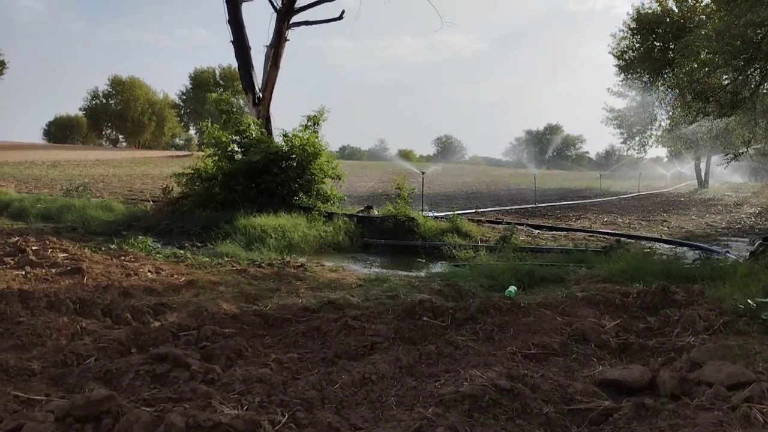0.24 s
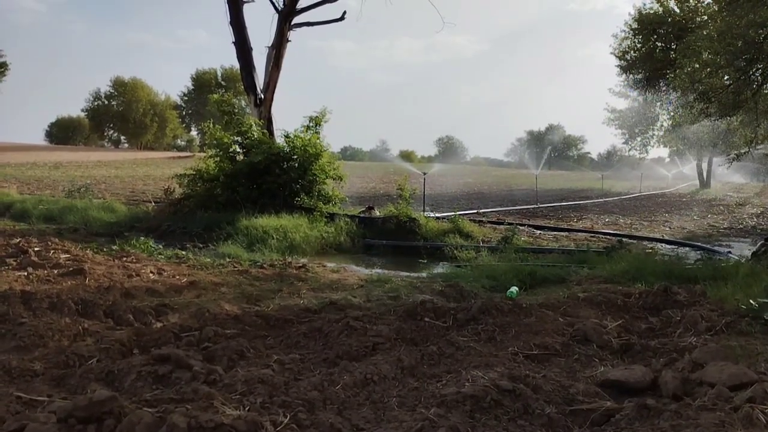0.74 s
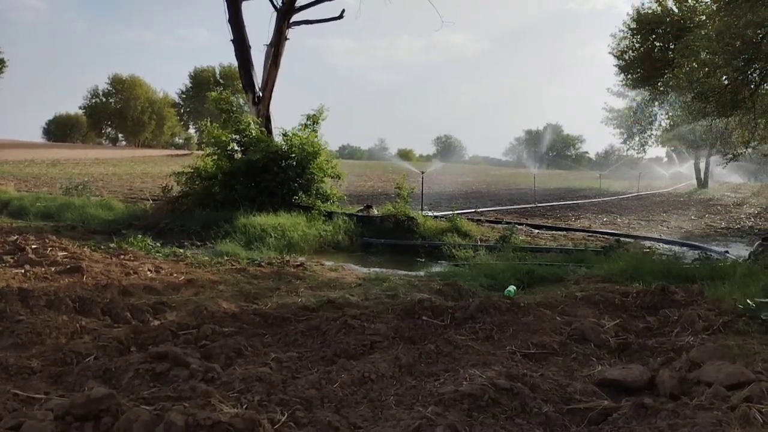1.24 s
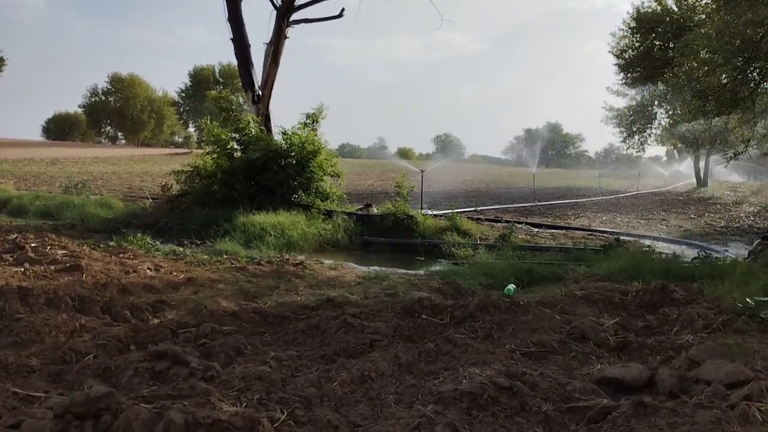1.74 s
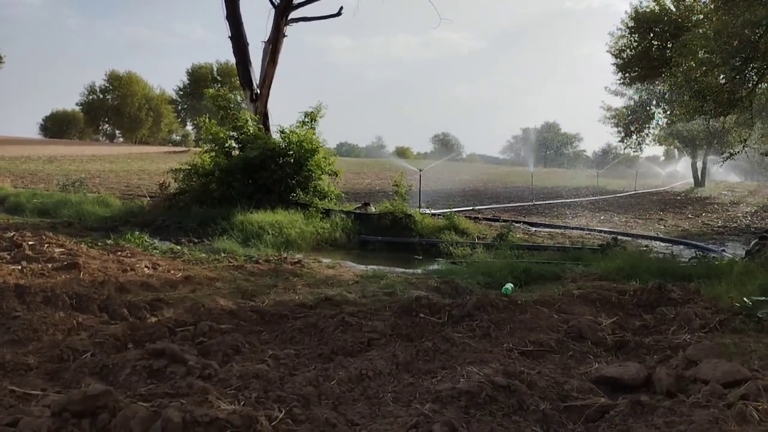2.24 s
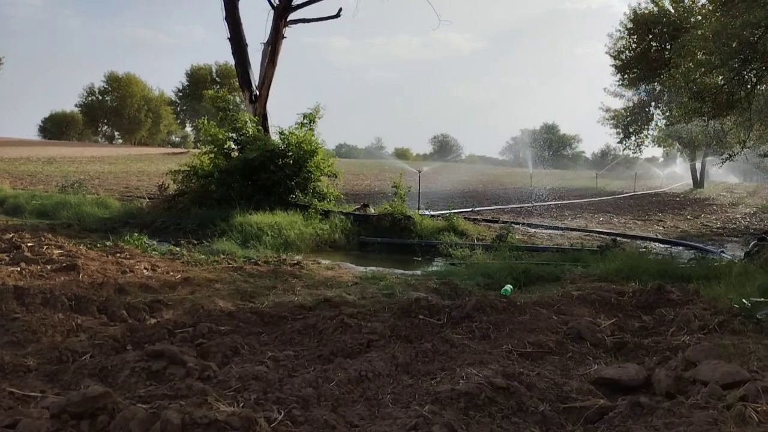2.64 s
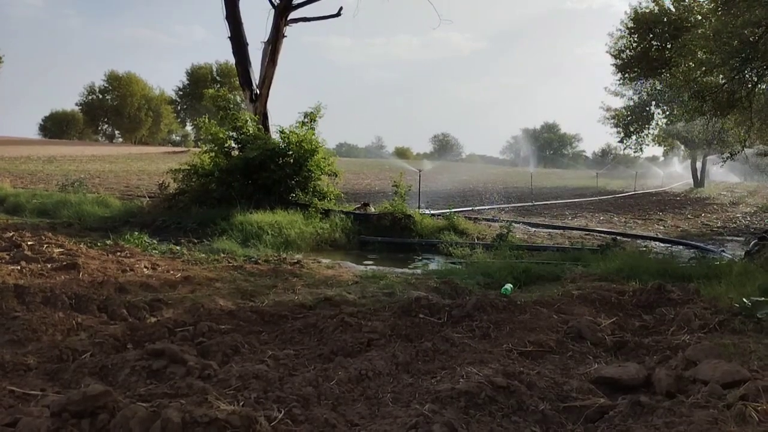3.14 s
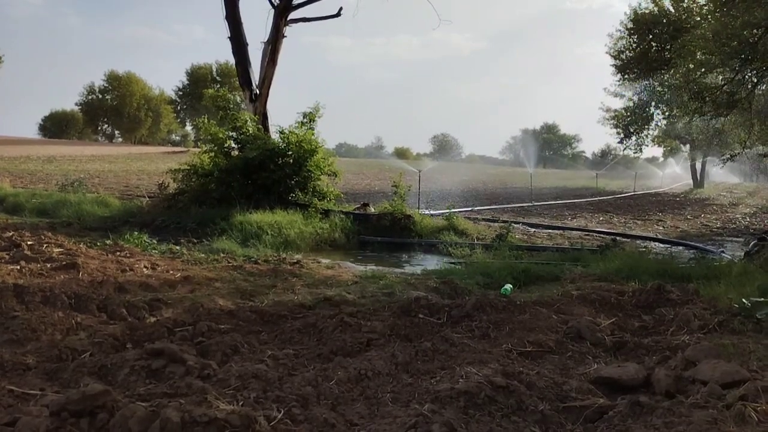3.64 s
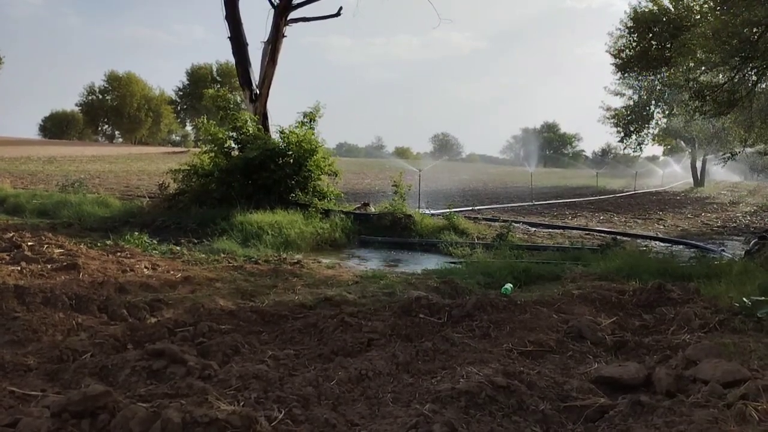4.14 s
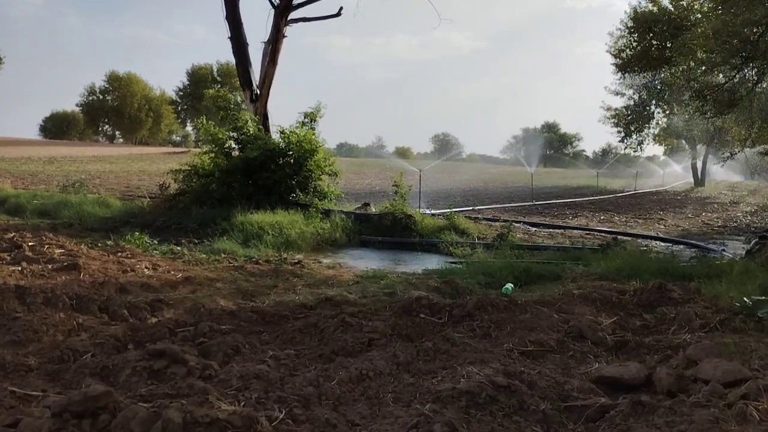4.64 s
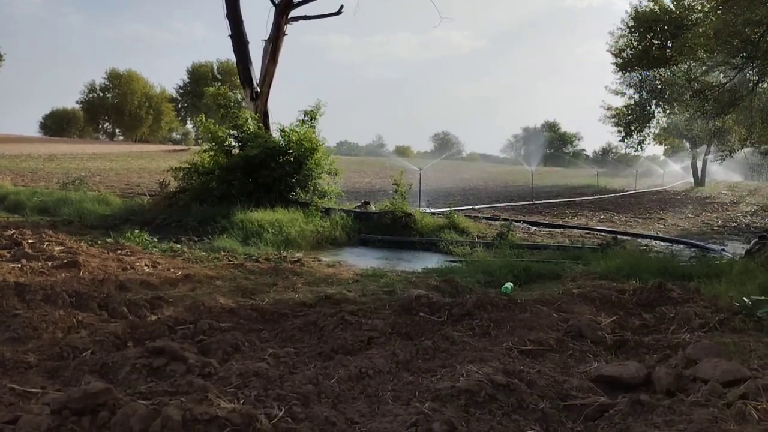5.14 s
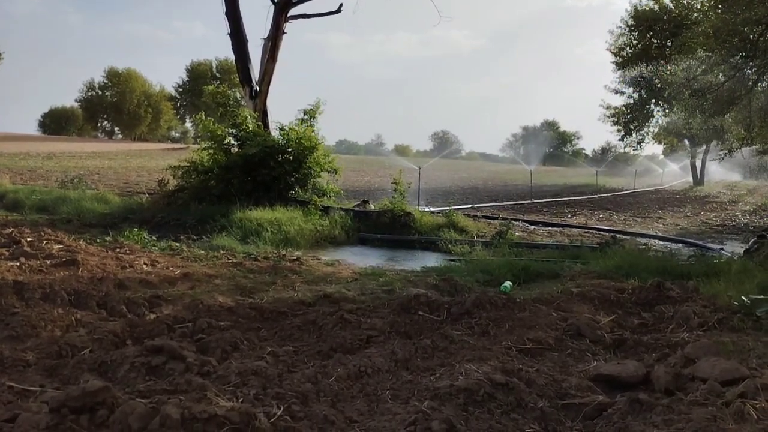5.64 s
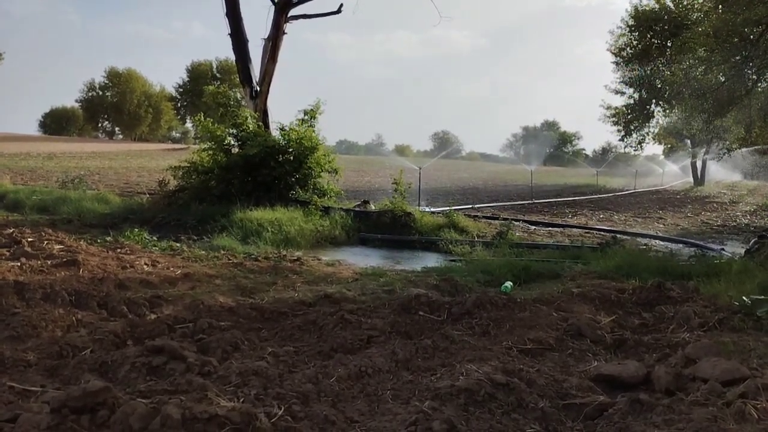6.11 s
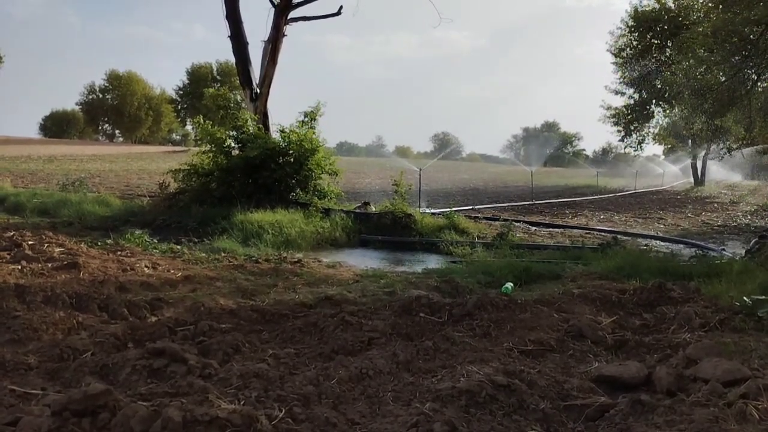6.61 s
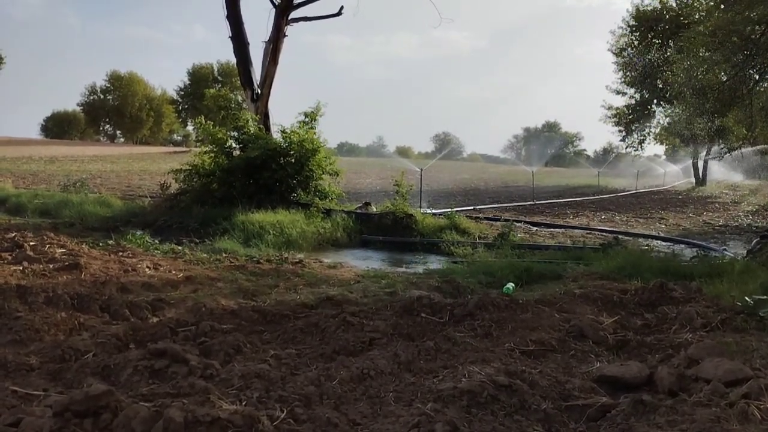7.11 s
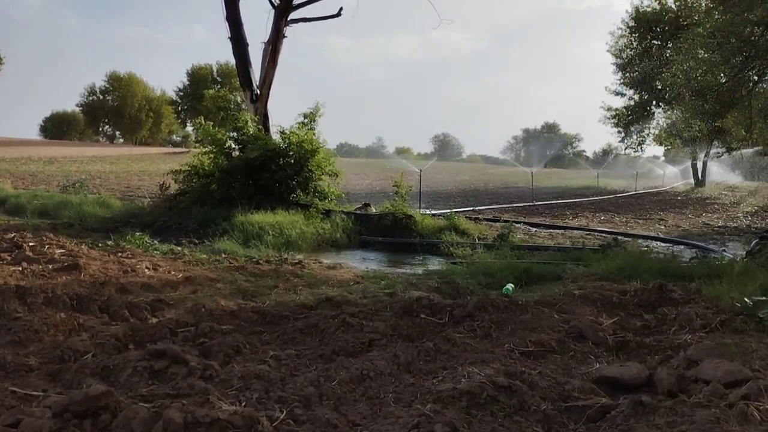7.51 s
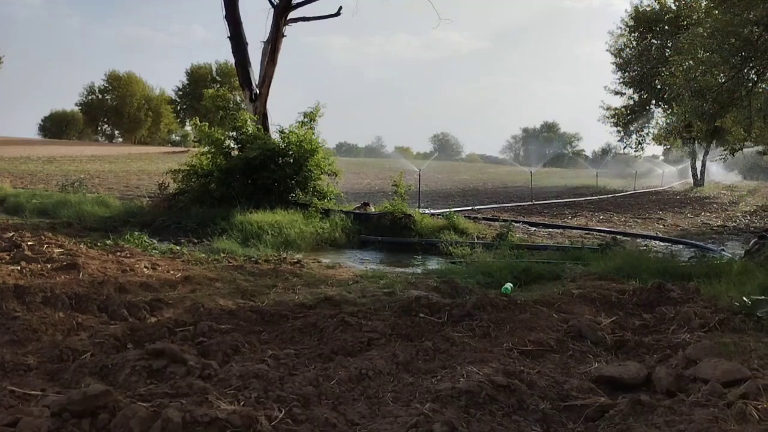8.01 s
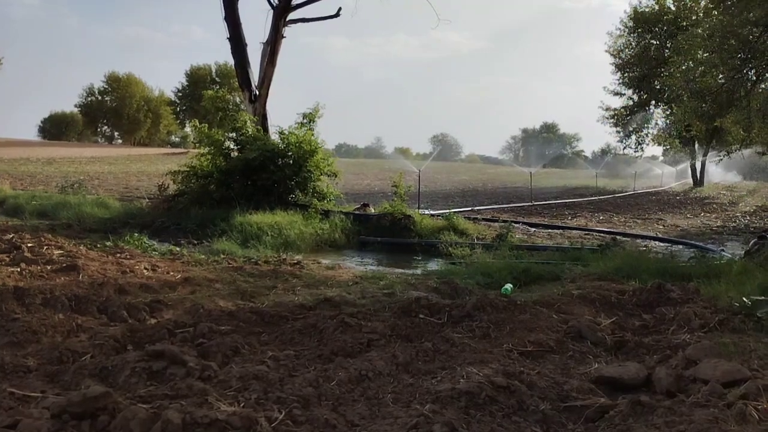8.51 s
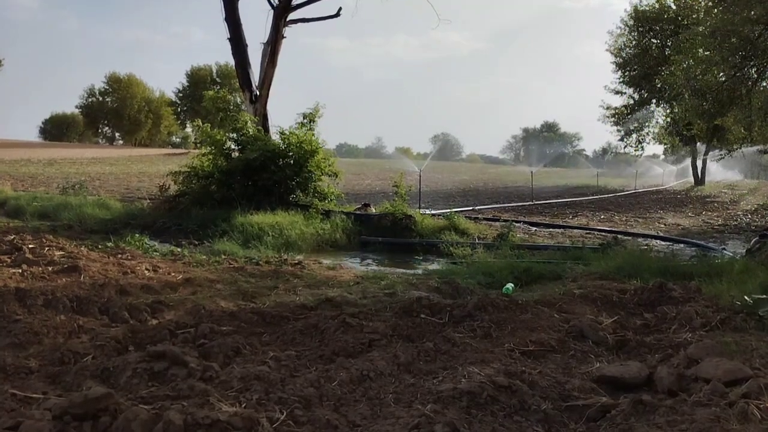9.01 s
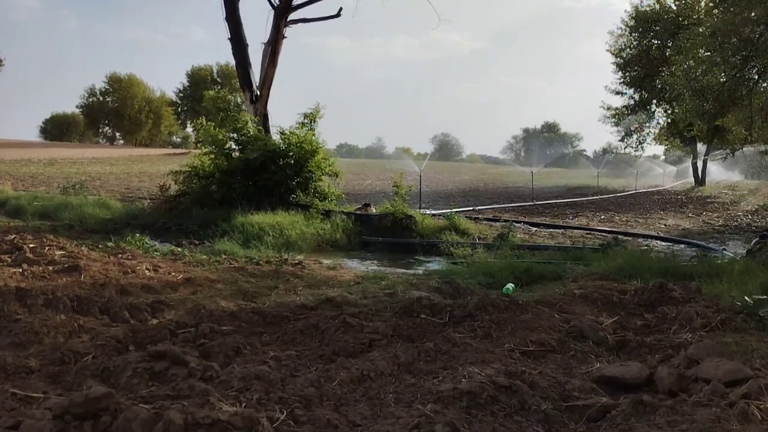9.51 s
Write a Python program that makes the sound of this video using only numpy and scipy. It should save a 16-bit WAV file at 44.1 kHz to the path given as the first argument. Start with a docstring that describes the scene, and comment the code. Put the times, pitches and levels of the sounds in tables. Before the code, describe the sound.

At the edge of an open field, far sprinklers make a steady bright hiss with fine pattering drops. A nearer one spits about four times a second, each spurt led by a small crack. Midway, sharp slaps land and water drums on something hollow. Faint bird whistles come at the start and near the end; dry taps click, then a gust thumps the microphone and rustles leaves.

```python
"""Impact sprinklers over a ploughed field

Heard from the edge of the field, the nearest sprinkler spits about four times a second over the hiss
of the others: filtered noise and ringing drops, swelling with each cut of the jet. Its water drums on
something hollow, a bank of resonators, most strongly about 4 s. Gliding sines make a far bird's whistles,
damped modes make a few dry taps and plinks, and a wavering sine makes a faint far tone. Near the end a gust
thumps the microphone with push-pull pulses and rustles leaves.
"""
import sys
import numpy as np
from scipy import signal
from scipy.fft import rfft, irfft, next_fast_len
from scipy.io import wavfile
from scipy.ndimage import uniform_filter1d

SR = 44100
rng = np.random.default_rng(int(sys.argv[2]) if len(sys.argv) > 2 else 0)


def output_pcm(signal):
    """Save a mono or channel-first signal as 16-bit PCM at the path in sys.argv[1].

    Samples are clipped to [-1, 1] before scaling.
    """
    pcm = np.clip(np.atleast_2d(signal).T, -1, 1) * 32767
    wavfile.write(sys.argv[1], SR, np.round(pcm).astype(np.int16))


N = 430414  # samples


def from_db(db):
    """Logarithmic level: 20 dB is a tenfold amplitude."""
    return 10 ** (np.asarray(db) / 20)


def rms_one(x):
    """Normalisation to unit mean power."""
    return x / np.sqrt(np.mean(x ** 2) + 1e-20)


def in_time(rows):
    """Linear interpolation of a control table at every sample."""
    return np.interp(np.arange(N) / SR, *np.transpose(rows))


def at_hz(points, hz):
    """Interpolation along a logarithmic frequency axis."""
    known, values = np.transpose(points)
    return np.interp(np.log(hz + 1), np.log(known), values)


def drift(rate_hz):
    """Low-passed noise: a random fluctuation of unit rms, slower than about rate_hz."""
    step, settle = 40, 2000  # samples per slow step, slow steps discarded
    r = np.exp(-2 * np.pi * rate_hz * step / SR)
    white = rng.standard_normal(N // step + settle + 2)
    slow = signal.lfilter([1], [1, -2 * r, r * r], white)[settle:]
    return np.interp(np.arange(N) / step, np.arange(len(slow)), rms_one(slow))


def resonate(x, hz, r):
    """Two-pole resonance: pole radius r sets the decay per sample."""
    return signal.lfilter([1, 0, -1], [1, -2 * r * np.cos(2 * np.pi * hz / SR), r * r], x)


# Likeness of the left and right channels: columns f/Hz, likeness (0 to 1)
CHANNEL_LIKENESS = [(2800, 1), (4400, 1), (6000, 0.94), (8000, 0.51), (14000, 0.64)]


def coloured(pair, colour, width=1):
    """Spectral shaping and mid-side stereo: two signals share a colour, wide only in the treble; mid rms 1."""
    size = next_fast_len(N, real=True)
    hz = np.arange(size // 2 + 1) * SR / size
    low_cut = hz / np.hypot(hz, 20)
    mid, side = rfft(pair, size) * from_db(at_hz(colour, hz)) * low_cut
    alike = np.clip(at_hz(CHANNEL_LIKENESS, hz), 0, 1)
    side_gain = width * np.sqrt((1 - alike) / (1 + alike))
    mid, side = irfft([mid, side * side_gain], size)[:, :N]
    return (mid + side * [[1], [-1]]) / np.std(mid)


def drops(per_s, spread_db, cycles, count=12):
    """Impulse excitation of resonators: chance drops ring at one of count pitches, -60 dB after cycles."""
    at = np.flatnonzero(rng.random(N) < per_s / SR)
    sizes_db = spread_db * np.minimum(rng.exponential(1, len(at)), 5)
    sizes = from_db(sizes_db) * rng.choice([-1, 1], len(at))
    place = rng.normal(0, 1, len(at))  # ratio of second channel to first
    dealt = rng.integers(0, count, len(at))
    out = np.zeros((2, N))
    for k, hz in enumerate(np.geomspace(4200, 13000, count)):
        mine = dealt == k
        clicks = np.full((2, N), 1e-18)
        clicks[:, at[mine]] = sizes[mine], sizes[mine] * place[mine]
        out += resonate(clicks, hz, from_db(-60 * hz / (cycles * SR)))
    return rms_one(out)


def clumps(per_s, t60):
    """Shot noise: chance hits begin at once and decay by 60 dB in t60 seconds; mean power 1."""
    hits = (rng.random(N) < per_s / SR) * rng.exponential(1, N) ** 2
    power = signal.lfilter([1], [1, -from_db(-120 / (t60 * SR))], hits + 1e-18)
    return power / power.mean()


def noise_bands(edges_hz):
    """Band-pass filtering: yield stereo noise split between neighbouring edges."""
    white = rng.standard_normal((2, 2, N))
    for k in range(len(edges_hz) - 1):
        sos = signal.butter(2, edges_hz[k:k + 2], "band", fs=SR, output="sos")
        yield signal.sosfilt(sos, white[k % 2])


def torn_water(patchy_db, lumpy, count=9):
    """Amplitude modulation of a breaking jet: lumpy in time, each band flickering on its own."""
    out = 0
    for band in noise_bands(np.linspace(200, 15000, count + 1)):
        out = out + band * from_db(patchy_db * drift(21.7))
    share = np.clip(lumpy, 0, 1)
    return out * np.sqrt(1 - share + share * clumps(per_s=600, t60=0.021))


def steadied(x, size=2200):
    """Short-term normalisation: keep the fine grain but hold the power even over about 50 ms."""
    return x / np.sqrt(uniform_filter1d(np.mean(x ** 2, axis=0), size) + 1e-12)


def swells(rows, shape):
    """Energy addition: bursts rise and die away, and their powers add."""
    power = np.zeros(N)
    for s, level_db, rise, fall in rows:
        near = np.arange(max(0, int((s - .2) * SR)), min(N, int((s + .3) * SR)))
        t = near / SR - s
        decay = np.where(t < 0, (t / rise) ** 2, np.abs(t / fall) ** shape)
        power[near] += (from_db(level_db) * np.exp(-decay)) ** 2
    return np.sqrt(power)


# Steady spray of the whole field: columns t/s, level/dB
SPRAY_LEVEL = [(0.0, -55.5), (1.63, -52), (8.56, -54.5), (9.76, -53)]
# Spectrum of that spray: columns f/Hz, level/dB per Hz
SPRAY_SPECTRUM = [(1000, -17.5), (2100, -14), (3000, -9.5), (4400, -4.5), (5700, -10.5), (6600, -2.5),
                  (7400, 1), (8600, 0.5), (10000, -2), (11500, -5.5), (12600, -9), (14500, -20.5)]


def field():
    """Superposition: far sprinklers blur into a hiss, from which nearer drops patter and tinkle."""
    hiss = from_db(-2.0) * coloured(torn_water(patchy_db=2.5, lumpy=0.05), SPRAY_SPECTRUM, width=1.19)
    patter = from_db(-9) * coloured(drops(per_s=2200, spread_db=3.8, cycles=12), SPRAY_SPECTRUM)
    tinkle_drops = drops(per_s=500, spread_db=3.0, cycles=160, count=37)
    tinkle = from_db(-10) * coloured(tinkle_drops, SPRAY_SPECTRUM)
    return from_db(in_time(SPRAY_LEVEL) + 1.18 * drift(7.5)) * (hiss + patter + tinkle)


def sizzle(patchy_db, count=16):
    """Narrow-band fluctuation: whistling bands come and go in the spray; rms 1."""
    out = 0
    weights = np.sqrt(np.hanning(count + 2)[1:-1])
    for weight, band in zip(weights, noise_bands(np.linspace(7000, 10000, count + 1))):
        out = out + weight * band * from_db(patchy_db * np.minimum(drift(13), 2))
    return rms_one(out[0] + .5 * out[1] * [[1], [-1]])


def whistling_spray(force):
    """Power addition: the sizzle follows the near and the steady water together."""
    all_water = np.hypot(force, from_db(in_time(SPRAY_LEVEL)))
    return from_db(-6.5) * all_water * steadied(sizzle(patchy_db=8))


# Murmur of open country: columns f/Hz, level/dB per Hz
AIR_SPECTRUM = [(100, 2.5), (220, 0.5), (300, -9.5), (440, -5.5), (580, -10.5), (1050, -13), (1300, -10.5),
                (1520, -18.5), (1720, -11), (2000, -25), (4000, -27)]
# Wind on the microphone: columns t/s, level/dB
WIND_LEVEL = [(0, -57.5), (5.4, -56.5), (7, -54.5), (8.55, -56), (8.8, -45.5), (9.76, -45.5)]
# Spectrum of that wind: columns f/Hz, level/dB per Hz
WIND_SPECTRUM = [(36, -1), (55, -0.5), (80, -6.5), (130, -14), (400, -42.5), (1000, -46)]


def air():
    """Broadband noise: a dull open-country murmur, and wind rumbling on the microphone."""
    far = coloured(rng.standard_normal((2, N)), AIR_SPECTRUM)
    far_gain = from_db(-64.5 + 0.67 * drift(4.2))
    wind = coloured(rng.standard_normal((2, N)), WIND_SPECTRUM)
    wind_gain = from_db(in_time(WIND_LEVEL) + 1.2 * drift(8.3))
    return far_gain * far + wind_gain * wind


# Faint far tone: columns t/s, level/dB
FAR_TONE_LEVEL = [(0, -82), (1.0, -76.5), (2.0, -82), (2.8, -75), (4.3, -80), (7.4, -80), (9.76, -87)]


def far_tone(hz=570):
    """Frequency modulation: a thin tone wavers in pitch and level at the edge of hearing."""
    pitch = hz * (1 + .04 * drift(4) + .02 * drift(30))
    gain = from_db(in_time(FAR_TONE_LEVEL) + 3.8 * drift(4.6))
    return gain * np.sin(2 * np.pi * np.cumsum(pitch) / SR)


# Bird whistles: columns t/s, length/s, start f/Hz, middle f/Hz, end f/Hz, level/dB
BIRD_WHISTLES = [(0.143, 0.11, 1700, 1885, 1950, -74.5), (0.268, 0.05, 2050, 1950, 1720, -75),
                 (7.815, 0.083, 2480, 2220, 2000, -70), (8.287, 0.054, 2620, 2530, 1980, -70.5),
                 (8.72, 0.05, 2780, 2650, 2380, -76)]


def bird():
    """Phase integration: thin whistles glide along parabolas, wavering in pitch and strength."""
    out = np.zeros(N)
    waver = 1 + .016 * drift(70)
    for s, length, start_hz, middle_hz, end_hz, level_db in BIRD_WHISTLES:
        u, at = np.linspace(0, 1, int(length * SR)), round(s * SR)
        glide = np.polyfit([0, .5, 1], [start_hz, middle_hz, end_hz], 2)
        hz = np.polyval(glide, u) * waver[at:at + len(u)]
        envelope = np.sqrt(2 * np.abs(np.sin(np.pi * u)))
        out[at:at + len(u)] += from_db(level_db) * envelope * np.sin(2 * np.pi * np.cumsum(hz) / SR)
    return out * (.9 + .35 * drift(50))


# The swinging arm cuts the jet about every quarter second: columns t/s, level/dB
JET_CUTS = [(0.154, -44), (0.39, -42.5), (0.638, -44), (0.876, -41.5), (1.115, -44), (1.373, -42),
            (1.603, -43.5), (1.85, -45.5), (2.074, -47), (2.313, -45), (2.557, -40.5), (2.813, -46),
            (3.039, -40.5), (3.274, -38), (3.518, -42), (3.762, -44.5), (4, -41.5), (4.24, -44.5),
            (4.49, -43), (4.726, -45), (4.965, -43.5), (5.202, -44), (5.445, -43), (5.688, -44.5),
            (5.927, -43.5), (6.168, -46), (6.412, -42.5), (6.65, -39.5), (6.892, -41.5), (7.135, -41),
            (7.373, -43), (7.61, -46), (7.855, -46), (8.11, -47.5), (8.343, -49), (8.585, -44.5),
            (8.803, -43.5), (9.061, -44.5), (9.283, -41), (9.547, -39.5)]
SPURT_RISE_S, SPURT_FALL_S = 0.014, 0.034
# The crack as the arm meets the jet comes before the spurt's peak; its level is relative to the spurt
CRACK_LEAD_S, CRACK_DB, CRACK_UNEVEN_DB = 0.0078, -6, 4
CRACK_RISE_S, CRACK_FALL_S = 0.00075, 0.0027


def spurts():
    """Periodic interruption: each arm swing gives a crack and a swell; rows t/s, level/dB, rise/s, fall/s."""
    rows = []
    for (s, level_db), sharp in zip(JET_CUTS, rng.uniform(-1, 1, len(JET_CUTS))):
        crack_db = level_db + CRACK_DB + CRACK_UNEVEN_DB * sharp
        rows.append((s - CRACK_LEAD_S, crack_db, CRACK_RISE_S, CRACK_FALL_S))
        rows.append((s, level_db, SPURT_RISE_S, SPURT_FALL_S))
    return rows


# Sharp cracks and slaps, the arm striking the jet or slugs of water landing:
# columns t/s at the peak, level/dB, fall/s
CRACKS_AND_SLAPS = [(1.541, -44.5, 0.0046), (2.551, -39, .006), (2.963, -38, 0.0065), (3.266, -36, 0.0085),
                    (3.411, -32.5, 0.0018), (3.644, -28, 0.0072), (3.752, -45, 0.0082), (3.877, -41, 0.046),
                    (4.239, -42, .006), (5.195, -35, 0.0026), (6.169, -36, .005), (6.408, -36.5, .008),
                    (9.061, -38, .003), (9.489, -35.5, 0.0094), (9.718, -31, .003)]
SHARP_RISE_S = 0.0011
# Thrown water swishes down between the spurts: columns t/s, level/dB
SOFT_SWISHES = [(.58, -50.5), (.974, -48), (2.888, -50.5), (4.653, -49), (5.045, -49.5), (6.025, -48),
                (6.225, -48.5), (8.007, -50), (8.417, -48), (8.998, -48), (9.204, -43.5), (9.4, -46.5),
                (9.622, -44.5)]
SWISH_RISE_S, SWISH_FALL_S = 0.021, 0.026
# Lesser slugs of water land at random
SPATTER_PER_S, SPATTER_DB, SPATTER_UNEVEN_DB = 8.9, -55, 4.5
SPATTER_RISE_S, SPATTER_FALL_S = 0.0023, 0.01


def strikes_and_landings():
    """Transient excitation: cracks, slaps, swishes and chance spatter; rows t/s, level/dB, rise/s, fall/s."""
    rows = [(s, level_db, SHARP_RISE_S, fall) for s, level_db, fall in CRACKS_AND_SLAPS]
    rows += [(s, level_db, SWISH_RISE_S, SWISH_FALL_S) for s, level_db in SOFT_SWISHES]
    for i in np.flatnonzero(rng.random(N) < SPATTER_PER_S / SR):
        level_db = SPATTER_DB + SPATTER_UNEVEN_DB * rng.standard_normal()
        rows.append((i / SR, level_db, SPATTER_RISE_S, SPATTER_FALL_S))
    return rows


# Spectrum of the near water: columns f/Hz, level/dB per Hz
SPURT_SPECTRUM = [(400, -33), (1300, -26), (2100, -32.5), (4200, -13), (5700, -17.5), (7000, -6.5),
                  (7700, -8.5), (8600, 0), (9300, -3), (11300, -9), (14500, -31.5)]


def sprinkler(force):
    """Envelope shaping: the water's force swells a bright mixture of torn hiss and coarse drops."""
    hiss = coloured(torn_water(patchy_db=3.6, lumpy=0.46), SPURT_SPECTRUM, width=0.75)
    coarse = from_db(-8) * coloured(drops(per_s=1200, spread_db=3.5, cycles=11), SPURT_SPECTRUM)
    return force * steadied(hiss + coarse)


# The jet sweeps over a hollow body: columns t/s, share of the water's force as level/dB
JET_AIM = [(0, -21.5), (2.4, -22), (2.9, -20.5), (4.03, -12.5), (4.3, -18.5), (9.76, -27)]
# Modes of that body: columns f/Hz, width/Hz, relative level/dB
HOLLOW_MODES = [(636, 12, -0.5), (870, 49, -8), (1374, 32, -9), (1749, 41, -3), (2110, 43, -14),
                (2540, 240, -9), (3390, 28, -1), (3414, 17, -3), (4600, 88, -18), (5800, 60, -4)]


def hollow_body(force):
    """Forced resonance: noisy blows of the water drive the modes of a hollow body."""
    blows = force * from_db(in_time(JET_AIM)) * rng.standard_normal(N)
    out = 0
    for hz, width_hz, level_db in HOLLOW_MODES:
        r = np.exp(-np.pi * width_hz / SR)
        peak_scale = (1 - r * r) / 2  # about unit gain at resonance
        out = out + from_db(level_db + 17.5) * peak_scale * resonate(blows, hz, r)
    return out


# Dry taps near the microphone: columns t/s, level/dB, brightness as low-pass f/Hz
DRY_TAPS = [(2.1572, -25.5, 7000), (5.786, -20.5, 400), (5.8113, -10.5, 15000), (6.893, -29.5, 1490)]
# What they ring with: columns f/Hz, level/dB, 60 dB decay t/s
KNOCK_MODES = [(209, -31.5, 0.026), (435, -11, 0.011), (797, -18.5, 0.018), (1258, -11.5, 0.014),
               (1780, -2.5, 0.0026), (3800, 0.5, 0.0014), (5117, -9.5, 0.0051), (6460, -12.5, 0.0055),
               (9416, -6, 0.0015), (13194, -11, 0.0015)]


def taps():
    """Modal synthesis: short contacts, each sounding the same heavily damped modes."""
    out, t = np.zeros(N), np.arange(SR // 20) / SR
    knock = np.zeros(len(t))
    for k, (hz, level_db, t60) in enumerate(KNOCK_MODES):
        knock += (-1) ** k * from_db(level_db - 60 * t / t60) * np.sin(2 * np.pi * hz * t)
    for s, level_db, bright_hz in DRY_TAPS:
        soft, at = np.exp(-2 * np.pi * bright_hz / SR), round(s * SR)
        out[at:at + len(t)] += from_db(level_db) * signal.lfilter([1 - soft], [1, -soft], knock)
    return out


# Single drops plink: columns t/s, level/dB, f/Hz, 60 dB decay t/s
LONE_DROPS = [(2.721, -30.5, 8200, 0.021), (2.961, -39, 8100, 0.053), (3.13, -39, 3570, 0.0055)]


def plinks():
    """Free damped vibration: a lone drop rings at one pitch."""
    out, t = np.zeros(N), np.arange(SR // 10) / SR
    for s, level_db, hz, t60 in LONE_DROPS:
        at = round(s * SR)
        out[at:at + len(t)] += from_db(level_db - 60 * t / t60) * np.sin(2 * np.pi * hz * t)
    return out


# Eddies thump the microphone: columns t/s, thump level/dB, flutter level/dB
EDDIES = [(8.188, -31.5, -66), (8.763, -36, -62), (8.866, -32.5, -53), (8.919, -30, -53), (9.264, -31, -54),
          (9.424, -31, -51), (9.581, -33, -54), (9.653, -32, -49.5), (9.721, -31, -51)]
# Turbulence behind each eddy: columns f/Hz, level/dB per Hz
FLUTTER_SPECTRUM = [(50, -18), (130, 4), (230, -2), (340, -14.5), (470, -14), (1000, -24.5), (3000, -43)]
FLUTTER_RISE_S, FLUTTER_FALL_S = .012, 0.033
# Leaves rustle in the gust: columns t/s, level/dB
RUSTLE_LEVEL = [(9.1, -81), (9.27, -52.5), (9.6, -48.5), (9.76, -59.5)]
# Spectrum of the leaves: columns f/Hz, level/dB per Hz
RUSTLE_SPECTRUM = [(300, -6), (450, 4.5), (900, -10), (2000, -8), (6000, 1), (10000, 6), (14500, -7)]


def gust(eddy_s=0.0043):
    """Turbulent pressure: each eddy pushes and pulls the microphone once and flutters; dry leaves crackle."""
    thumps, t = np.zeros(N), np.arange(-SR // 30, SR // 30) / SR
    for s, level_db, _ in EDDIES:
        u = t / (eddy_s * from_db(rng.normal(0, 2.5)))  # eddies differ in duration
        push = -2 * u * np.exp(-np.abs(u) ** 1.2)
        at = round(s * SR) - len(t) // 2
        thumps[at:at + len(t)] += from_db(level_db) * push[:N - at]
    flutter_rows = [(s, flutter_db, FLUTTER_RISE_S, FLUTTER_FALL_S) for s, _, flutter_db in EDDIES]
    passing = swells(flutter_rows, shape=1.4)
    flutter = passing * coloured(rng.standard_normal((2, N)), FLUTTER_SPECTRUM)
    crackle = rng.standard_normal((2, N)) * np.sqrt(clumps(per_s=600, t60=0.031))
    leaves = from_db(in_time(RUSTLE_LEVEL)) * coloured(crackle, RUSTLE_SPECTRUM)
    return thumps + flutter + leaves


def scene():
    """Linear superposition of water, air, tone, bird, taps and gust."""
    force = np.hypot(swells(spurts(), shape=1.88), swells(strikes_and_landings(), shape=0.81))
    water = field() + whistling_spray(force) + sprinkler(force) + hollow_body(force) + plinks()
    return water + air() + far_tone() + bird() + taps() + gust()


def record(dry):
    """Elliptic low-pass filtering: the treble is cut steeply above 14.4 kHz."""
    ripple_db, stop_db, cutoff_hz = .2, 70, 14400
    return signal.sosfilt(signal.ellip(10, ripple_db, stop_db, cutoff_hz, fs=SR, output="sos"), dry)


dry = scene()
out = record(dry)
output_pcm(out)
```